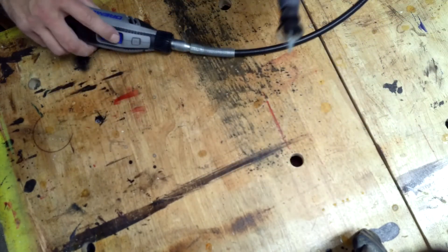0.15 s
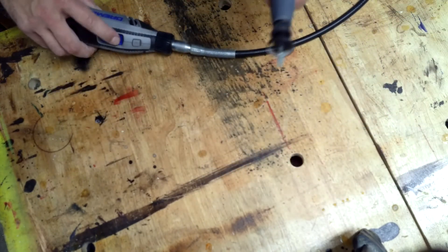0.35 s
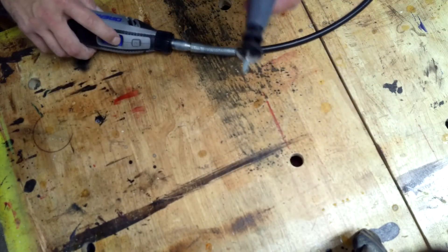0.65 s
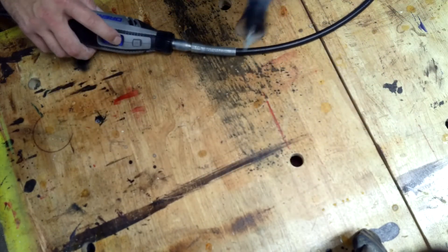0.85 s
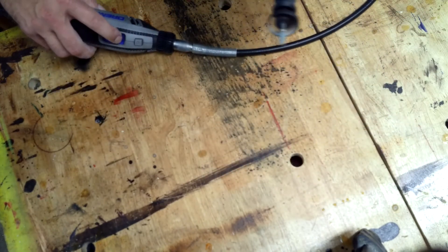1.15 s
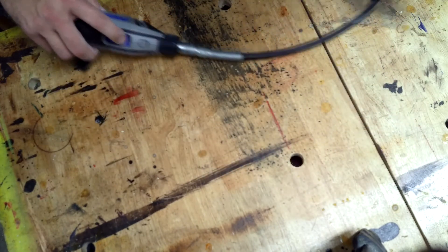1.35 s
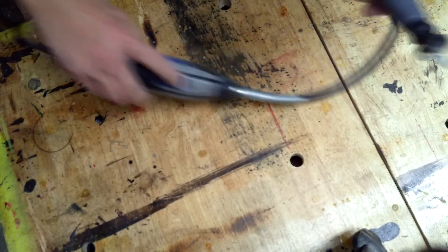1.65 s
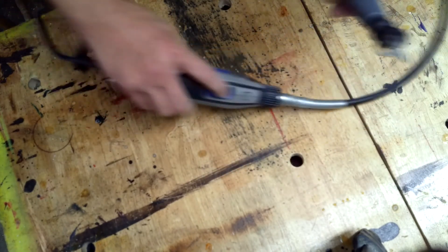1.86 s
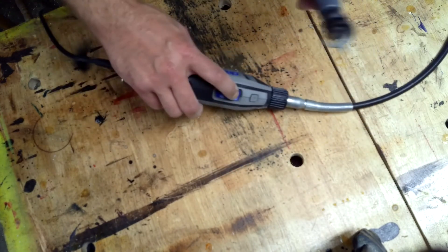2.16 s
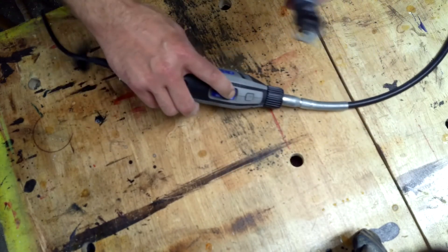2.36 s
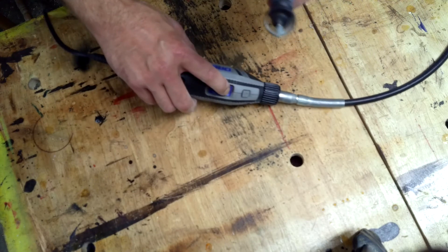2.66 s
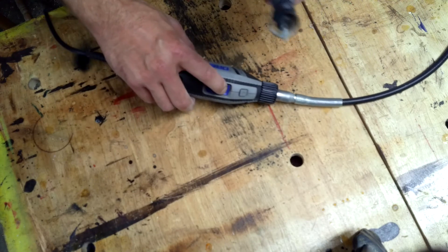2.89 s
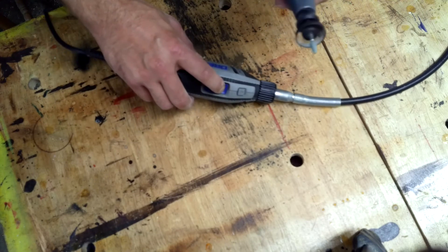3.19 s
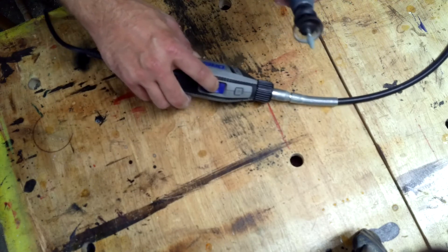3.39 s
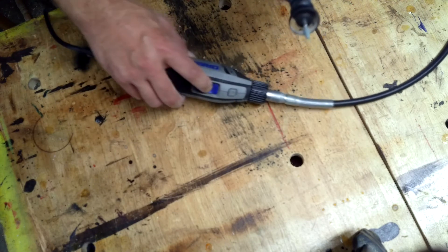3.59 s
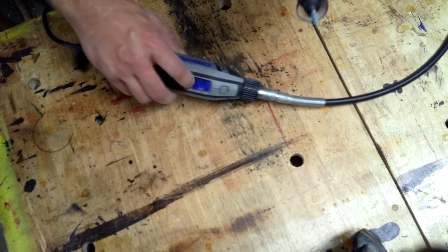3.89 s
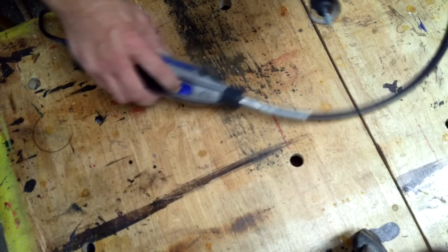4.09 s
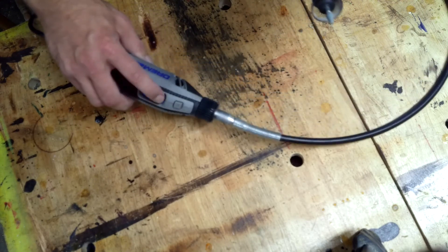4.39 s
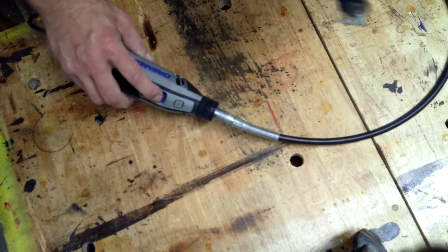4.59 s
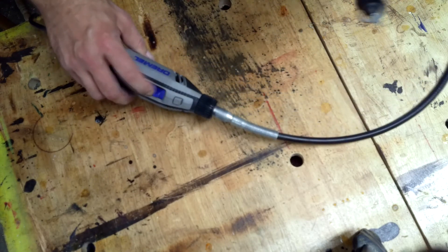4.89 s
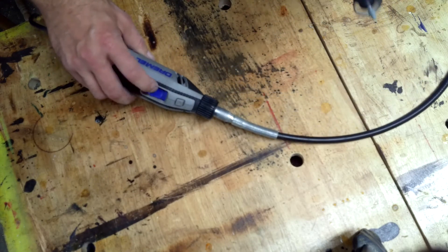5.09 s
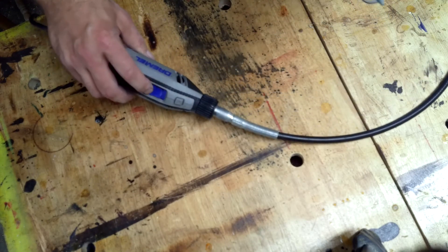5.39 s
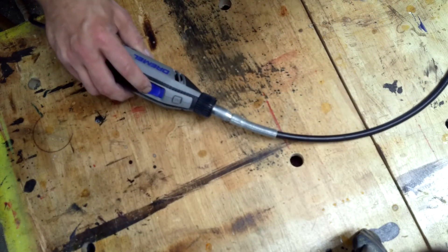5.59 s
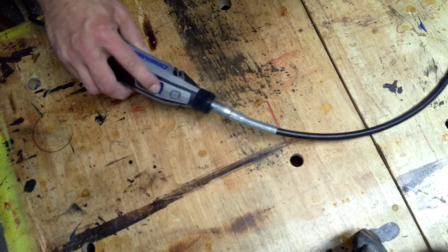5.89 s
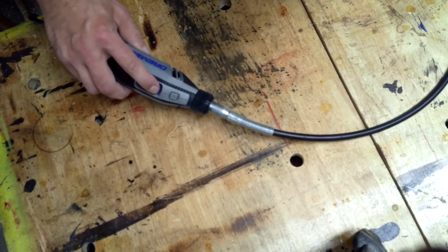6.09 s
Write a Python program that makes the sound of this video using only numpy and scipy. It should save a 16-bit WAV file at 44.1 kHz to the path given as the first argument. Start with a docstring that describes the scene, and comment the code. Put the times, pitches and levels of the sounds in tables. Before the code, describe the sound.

Close, dry pickup of a small rotary tool above a wooden workbench. It is already spinning up as the sound begins, then holds a high, slightly wavering whine with rushing air and electric buzz. A switch clicks, the pitch slides down, the motor is briefly restarted, clicked off to coast again, and finally switched on once more. Faint low workshop noise lies beneath.

```python
"""A small rotary tool with a flexible shaft whines just above a wooden workbench.
It spins up to about 22000 turns a minute, is switched off and coasts, and is restarted twice.
Its fan whines and rushes, the armature buzzes with the chopped mains, and rotor and shaft add tones and hum.
Tones are sine waves locked to one rotor speed; air and bearings are coloured noise; the slide switch
is pairs of clicks that make its shell ring. A soft workshop background lies underneath."""
import sys
import numpy as np
from scipy import signal
from scipy.fft import rfft, irfft, next_fast_len
from scipy.io import wavfile
from scipy.ndimage import uniform_filter1d

SR = 44100
rng = np.random.default_rng(int(sys.argv[2]) if len(sys.argv) > 2 else 0)


def master_out(mix):
    """Clip the mix to full scale and print it as 16-bit PCM to the path in sys.argv[1]."""
    frames = np.transpose(np.atleast_2d(mix))
    ceiling = np.clip(frames, -1, 1)
    pcm = np.round(ceiling * 32767).astype(np.int16)
    wavfile.write(sys.argv[1], SR, pcm)


N = 275625
TIME = np.arange(N) / SR
FULL_SPEED_HZ = 372.3   # turns per second
MAINS_HZ = 60
CUTOFF_HZ = 15600   # top of the finished sound


def from_db(db):
    """Turn decibels into a gain."""
    return 10 ** (np.asarray(db) / 20)


def rms_one(x):
    """Scale a signal to an average (rms) strength of 1."""
    return x / np.sqrt(np.mean(x ** 2) + 1e-20)


def in_time(rows):
    """Read each column of a time table at every sample, with straight lines between rows."""
    times_s, *columns = np.transpose(rows)
    return [np.interp(TIME, times_s, column) for column in columns]


def at_hz(points, hz):
    """Read a table of pitch and level, spacing the pitches as the ear does (log scale)."""
    known_hz, level_db = np.transpose(points)
    return np.interp(np.log(np.maximum(hz, 1)), np.log(known_hz), level_db)


def noise(spectrum):
    """Random hiss of the given colour, rms 1."""
    size = next_fast_len(N)
    bins_hz = np.arange(size // 2 + 1) * SR / size
    white = rfft(rng.standard_normal(size))
    return rms_one(irfft(white * from_db(at_hz(spectrum, bins_hz)), size)[:N])


def drift(rate_hz):
    """Slow random wandering around 0 with a spread of about 1."""
    step = 40   # computed at every 40th sample, then joined by straight lines
    pole = np.exp(-2 * np.pi * step * rate_hz / SR)
    white = rng.standard_normal(N // step + 2002)
    slow = signal.lfilter([1], [1, -2 * pole, pole * pole], white)[2000:]   # skip the filter's start
    return np.interp(np.arange(N) / step, np.arange(len(slow)), rms_one(slow))


def angle(turns_hz):
    """Running angle, in radians, of something that turns at this rate."""
    return 2 * np.pi * np.cumsum(turns_hz) / SR


def resonate(x, hz, width_hz):
    """A resonance that favours one pitch, with gain 1 at its top."""
    r = np.exp(-np.pi * width_hz / SR)
    top = np.array([1, 0, -1]) * (1 - r * r) / 2
    return signal.lfilter(top, [1, -2 * r * np.cos(2 * np.pi * hz / SR), r * r], x)


def ring(clicks, hz, t60_s):
    """Each unit click starts a sine of height 1 that fades by 60 dB in t60_s."""
    r = np.exp(-np.log(1000) / (t60_s * SR))
    w = 2 * np.pi * hz / SR
    return signal.lfilter([0, np.sin(w)], [1, -2 * r * np.cos(w), r * r], clicks + 1e-18)


# The motor's runs: on_s, off_s, pull (turns per s per s), soft_start_s
RUNS = [(-.1, 3.32, 1298, .1), (4.125, 4.733, 1075, .095), (5.701, 6.4, 1141, .201)]
# Turns per s at the outset, and where the motor would end up without its governor
START_HZ, RUNAWAY_HZ = 154, 996
# The governor takes over gradually, overshoots and settles
TAKEOVER_HZ, OVERSHOOT_HZ, SETTLE_S, SWING_HZ = 33.3, 46.9, .122, .97
# Coasting: dry friction of the brushes, and drag that grows with the speed
FRICTION_HZ_PER_S, DRAG_PER_S = 120, .695
BACK_OFF_HZ = 62.3   # starting current backs off over these last turns per s below full speed


def drive(opening_law=0.42):
    """The motor pulls up to the governed speed; friction and drag slow it after switch-off."""
    speed = np.full(N, float(START_HZ))
    powered, surge = np.zeros(N), np.zeros(N)
    for on_s, off_s, pull, soft_start_s in RUNS:
        opening = np.clip((TIME - on_s) / soft_start_s, 0, 1)
        # without a governor, the speed closes in on the runaway speed
        shortfall = RUNAWAY_HZ - np.interp(on_s, TIME, speed)
        free = RUNAWAY_HZ - shortfall * np.exp(-pull * np.cumsum(opening) / SR / RUNAWAY_HZ)
        held_s = np.cumsum(free > FULL_SPEED_HZ) / SR
        overshoot = OVERSHOOT_HZ * np.exp(-held_s / SETTLE_S) * np.cos(2 * np.pi * SWING_HZ * held_s)
        held = FULL_SPEED_HZ + overshoot
        # the lower of the two speeds, with a rounded corner
        governed = -TAKEOVER_HZ * np.logaddexp(-free / TAKEOVER_HZ, -held / TAKEOVER_HZ)
        left = np.exp(-DRAG_PER_S * np.maximum(TIME - off_s, 0))
        braked = governed * left - FRICTION_HZ_PER_S / DRAG_PER_S * (1 - left)
        speed = np.where(TIME > on_s, braked, speed)
        fed = (TIME > on_s) & (TIME < off_s)
        powered = powered + fed
        back_off = np.clip((FULL_SPEED_HZ - speed) / BACK_OFF_HZ, 0, 1)
        surge = surge + fed * opening ** opening_law * back_off
    return speed, powered, surge


# The five-bladed fan's whine before trim and dip: blade_rate_hz, level_db
FAN = [(550, -66), (800, -46), (1100, -38), (1350, -29), (1550, -25), (1750, -22), (1920, -25)]
# Depth of a dip in the sound field as the tool is moved: time_s, depth_db
DIP = [(.4, -3.5), (1.2, -1), (1.5, -10), (1.7, -1), (1.95, -15), (2.35, -10.5), (2.7, -16), (4.57, -14.5),
       (4.68, -3), (6.2, -10)]
# Trim of the whine, then the dip's centre and half width (just around full speed)
FAN_DB, DIP_HZ, DIP_WIDTH_HZ = -1.5, 1880, 72


def fan(turn, speed, coasting, blade_count=5, flutter_db=1.47, coasting_db=1.0):
    """The blades chop the air into one clear whine, a little stronger while the rotor coasts."""
    hz = blade_count * speed
    dip_db = in_time(DIP)[0] * np.exp(-((hz - DIP_HZ) / DIP_WIDTH_HZ) ** 2)
    level_db = FAN_DB + at_hz(FAN, hz) + dip_db + coasting_db * coasting + flutter_db * drift(32)
    whine = np.sqrt(2) * from_db(level_db) * np.sin(blade_count * turn)
    return bench_echo(whine, share=0.46)


def bench_echo(x, share, delay_s=0.005202):
    """One reflection: a gliding tone swells and fades as direct and late sound add or cancel."""
    late = np.interp(TIME - delay_s, TIME, x, left=0)
    return (x + share * late) / np.sqrt(1 + share ** 2)


# Armature slot tones: multiple_of_speed, level_db (relative)
SLOTS = [(8, 0), (16, -5), (24, -9), (32, -13)]
# Resonances of the armature housing: pitch_hz, width_hz, level_db, polarity (1 or -1)
HOUSING = [(2380, 320, -1, -1), (2720, 380, 0, 1), (3900, 500, -6, 1), (6000, 900, -13, 1)]


def armature(turn, current, twist=0.17, rough=0.17, uneven_db=0.5):
    """Slots pass the poles under each current burst, the rotor twists slightly, the housing rings."""
    swing = twist * np.sin(2 * np.pi * 2 * MAINS_HZ * TIME)
    chatter = rough * drift(260)   # grows tone by tone, so the upper slot tones are blurred
    force = 0
    for i, (multiple, level_db) in enumerate(SLOTS):
        force = force + from_db(level_db) * np.sin(multiple * turn - swing + (i + 1) * chatter)
    bursts = mains_pulses(sharpness=1.9) * from_db(uneven_db * drift(36))
    force = np.sqrt(2) * force * current * bursts
    return sum(sign * from_db(db) * resonate(force, hz, width) for hz, width, db, sign in HOUSING)


def mains_pulses(sharpness):
    """The speed control lets a burst of current through in each half wave of the mains; rms 1."""
    return rms_one(np.exp(sharpness * np.cos(2 * np.pi * 2 * MAINS_HZ * TIME)))


# Tones of rotor and shaft, with the case's full-speed colouring: multiple_of_speed, powered_db, coasting_db
ROTOR = [(2, -59, -55), (3, -45, -52), (4.08, -43, -53), (6, -46, -47), (7, -42, -42), (8, -38, -42),
         (9, -44, -39), (10, -47, -37), (11, -45, -41), (12, -45, -44), (14, -44, -48), (15, -46, -46),
         (16, -44, -36), (18, -47, -50), (20, -48, -51), (23, -46, -48), (24, -42, -48), (26, -39, -40),
         (31, -53, -56), (32, -49, -52)]
# How well the case radiates a tone: pitch_hz, level_db (relative)
RADIATION = [(270, -42), (370, -22), (700, -19), (1200, -13), (1720, 1), (2100, -6), (2550, 0), (3000, -5),
             (3450, 0), (3720, -2), (4300, 0), (5000, -1), (6200, 4), (7200, 2), (8300, -5), (9700, -2),
             (12000, -3)]
# Tilting turns other faces of the case outward and recolours the tones: pitch_hz, change_db
TILT = [(2600, -3), (3000, -14), (3400, 0), (3780, 12), (4300, -2.5), (6000, 2.5), (7500, -6), (9000, -3.5)]


def rotor(turn, speed, coasting, pose, coasting_trim_db=-1.0, waver_db=4.0, wander_db=-0.5, rough=0.076):
    """Commutator bars and bearing balls give a ladder of tones, which lingers while the rotor coasts."""
    pace = speed / FULL_SPEED_HZ
    tilted = np.interp(pose, [.9, 1.25], [0, 1])
    # gliding tones swell and fade as they cross the many narrow modes of the case
    mode_hz = np.arange(0, CUTOFF_HZ, 130)
    mode_db = rng.uniform(-4, 4, len(mode_hz))
    gliding = np.clip(10 * (1 - pace), 0, 1)
    tones = 0
    for multiple, powered_db, coasting_db in ROTOR:
        hz, full_hz = multiple * speed, multiple * FULL_SPEED_HZ
        power_db = powered_db + tilted * at_hz(TILT, full_hz) + wander_db * drift(1.0)
        under_power = from_db(power_db) * pace ** 5
        running_down = from_db(coasting_trim_db + coasting_db) * pace ** 1.3
        # the case counts only as a change from what it does at full speed
        radiated_db = at_hz(RADIATION, hz) - at_hz(RADIATION, full_hz)
        radiated_db = radiated_db + gliding * np.interp(hz, mode_hz, mode_db)
        gain = (1 - coasting) * under_power + coasting * running_down
        gain = gain * from_db(radiated_db + waver_db * drift(9.2))
        tones = tones + gain * np.sin(multiple * turn + rough * drift(38))
    return np.sqrt(2) * tones


# Colour of the cooling air with the tool in the far corner: pitch_hz, level_db (relative, per Hz)
AIR_FAR = [(120, -31), (280, -55), (480, -37), (800, -10.5), (1250, -11.5), (2000, -13), (2800, -3.5),
           (3600, -5), (4400, -13), (5600, -7.5), (7500, -9), (9200, -10), (12000, -16.5), (15000, -28)]
# The same at mid bench: pitch_hz, level_db (relative, per Hz)
AIR_MID = [(120, -24), (280, -25.5), (520, -4), (850, -7), (1150, -3), (1700, -6), (2600, 5.5), (3400, 0),
           (4200, -10.5), (5300, 3), (7200, 0.5), (9500, -4), (12000, -10), (15000, -23.5)]
# The same with the tool tilted: pitch_hz, level_db (relative, per Hz)
AIR_TILTED = [(120, -25), (280, -20.5), (500, -3), (800, -4.5), (1200, 0.5), (2100, -1.5), (2900, 4.5),
              (3800, 3), (4900, -5.5), (6300, 3.5), (8000, -3), (9200, -2), (12000, -9.5), (15000, -23)]
# Swell of the air stream as the grip shifts: time_s, change_db
GRIP = [(.3, 1), (2.6, 1.1), (3.25, 3), (3.7, 1.2), (6.25, 2)]


def air(pace, pose, speed_law=1.93, gust_db=0.76):
    """Cooling air rushes through the vents, coloured by how the tool is held."""
    rush = 0
    for i, (colour, level_db) in enumerate([(AIR_FAR, -24.5), (AIR_MID, -24.0), (AIR_TILTED, -23.8)]):
        share = np.sqrt(np.maximum(1 - abs(pose - i), 0))   # blend neighbouring poses
        rush = rush + share * from_db(level_db) * noise(colour)
    return rush * pace ** speed_law * from_db(in_time(GRIP)[0] + gust_db * drift(15.0))


# Colour of the bearing hiss: pitch_hz, level_db (relative, per Hz)
BEARINGS = [(120, -20.5), (280, -18), (520, -5.5), (800, 0.5), (1100, -2.5), (1650, 2), (2400, -1),
            (3900, 1), (5000, 0), (6300, -7.5), (8000, -4), (9500, -8.5), (12000, -12.5), (15000, -39)]


def bearings(turn, pace, level_db=-30, speed_law=0.78, rub=0.17, grain_db=1.5):
    """Bearings and brushes hiss, rubbing harder once a turn."""
    grain = from_db(level_db + grain_db * drift(230))
    return grain * noise(BEARINGS) * pace ** speed_law * (1 + rub * np.sin(turn))


# Hollows of the case, which ring in the hiss: pitch_hz, width_hz, level_db
HOLLOWS = [(548, 17, -6), (1190, 135, -7), (1470, 260, -30), (2430, 65, -14.5), (3530, 160, -16.5),
           (9000, 260, -8)]


def case(hiss):
    """The hollows of the case add resonances that stay put while the speed changes."""
    return hiss + sum(from_db(db) * resonate(hiss, hz, width) for hz, width, db in HOLLOWS)


# Moves of the slide switch: start_s, level_db, brightness_hz (treble above it is cut)
SWITCH = [(3.3187, -4.5, 5470), (4.1227, -7, 9050), (4.7321, -4, 11000), (5.6695, -5.5, 8200)]
# Ringing tones of the shell under the switch: pitch_hz, level_db, t60_s (time to fade by 60 dB)
SHELL = [(159, -41, 0.0084), (730, -13.5, 0.012), (1590, -15, 0.0084), (2200, -5, 0.0059),
         (3680, -3.5, 0.012), (4480, -9, 0.0069), (6120, 2, 0.0042), (6700, 2, 0.0037),
         (7970, -0.5, 0.0059), (11500, -10, 0.019)]


def switch(travel_s=.0007, first_db=-4, room_db=-11):
    """The slider slips over its detent, hits the stop a moment later, and the shell rings."""
    blows = np.zeros(N)
    for start_s, level_db, bright_hz in SWITCH:
        contacts = np.zeros(N)
        moments = [round(start_s * SR), round((start_s + travel_s) * SR)]
        contacts[moments] = from_db([level_db + first_db, level_db])
        soften = signal.butter(4, bright_hz, fs=SR, output="sos")
        blows += signal.sosfilt(soften, contacts + 1e-18)
    # neighbouring shell tones start in opposite directions
    snap = sum((-1) ** i * from_db(db) * ring(blows, hz, t60) for i, (hz, db, t60) in enumerate(SHELL))
    return snap + from_db(room_db) * workshop(snap)


# Hum of the unbalanced rotor at full speed: pose (0 to 2, as in POSE), level_db
UNBALANCE = [(.04, -71), (.1, -45), (.8, -56.5), (1.3, -47)]


def unbalance(turn, pace, pose, speed_law=9.8):
    """The rotor shakes the case once a turn; the hum carries only near full speed."""
    level_db = np.interp(pose, *np.transpose(UNBALANCE))
    return np.sqrt(2) * from_db(level_db) * pace ** speed_law * np.sin(turn)


# Whirl of the flexible shaft: time_s, turns_hz, second_multiple_db, third_multiple_db
WHIRL = [(0, 29.5, -50.5, -62), (.9, 30.3, -58, -51.5), (2.1, 37, -50, -52.5), (2.3, 29, -60, -62),
         (2.5, 28, -50, -72), (2.9, 22.5, -59, -79), (3.5, 22, -92, -90)]


def shaft():
    """The flexible shaft whirls in its sleeve with a faint low hum."""
    turns_hz, second_db, third_db = in_time(WHIRL)
    whirl = angle(turns_hz)
    return np.sqrt(2) * (from_db(second_db) * np.sin(2 * whirl) + from_db(third_db) * np.sin(3 * whirl))


def workshop(x, t60_s=0.15):
    """Bench and walls scatter the sound into a short fading tail of echoes."""
    t = TIME[:SR // 4]
    tail = rng.standard_normal(len(t)) * np.exp(-np.log(1000) * t / t60_s) * (t > .002)
    return signal.fftconvolve(x, tail / np.sqrt(np.sum(tail ** 2)))[:N]


# Colour of the workshop background: pitch_hz, level_db (relative, per Hz)
ROOM = [(20, -12), (50, -6), (100, -3), (180, -1.5), (300, -3.5), (600, -16), (2000, -32.5)]


def background(level_db=-57):
    """The workshop background is a steady, mostly low noise."""
    return from_db(level_db) * noise(ROOM)


# Where the tool is held: time_s, pose (0 = far corner, 1 = mid bench, 2 = tilted)
POSE = [(0, 0), (1.3, 0.32), (1.7, 0.87), (3.8, 0.79), (4.3, 2.16), (6.25, 1.96)]
# Motor current needed to hold the speed against the shaft, at full speed: time_s, level_db
LOAD = [(.3, -22), (.7, -26.5), (1.3, -21), (1.5, -29.5), (2.6, -25), (3.3, -21.5), (4.4, -43), (4.73, -24),
        (6.1, -35)]
SURGE_DB = -20.5   # starting current at its strongest


def scene(hunting=0.000898):
    """One rotor speed drives the fan, armature, rotor, air and bearings; both channels are alike."""
    speed, powered, surge = drive()
    speed = speed * (1 + hunting * drift(3.89))   # a tiny unsteadiness
    turn, pace, pose = angle(speed), speed / FULL_SPEED_HZ, in_time(POSE)[0]
    holding = from_db(in_time(LOAD)[0]) * powered * pace
    current = np.hypot(from_db(SURGE_DB) * surge, holding)
    coasting = 1 - uniform_filter1d(powered, size=2000)   # blends over 2000 samples
    tones = fan(turn, speed, coasting) + armature(turn, current) + rotor(turn, speed, coasting, pose)
    tones = tones + from_db(-14) * workshop(tones)
    hiss = case(air(pace, pose) + bearings(turn, pace))
    hum = unbalance(turn, pace, pose) + shaft()
    return np.tile(tones + hiss + hum + switch() + background(), (2, 1))


def record(dry, ceiling=0.69):
    """Loud peaks are rounded off, then the highest treble is cut."""
    rounded = ceiling * np.tanh(dry / ceiling)
    return signal.sosfilt(signal.ellip(12, .1, 80, CUTOFF_HZ, fs=SR, output="sos"), rounded)


dry = scene()
out = record(dry)
master_out(out)
```